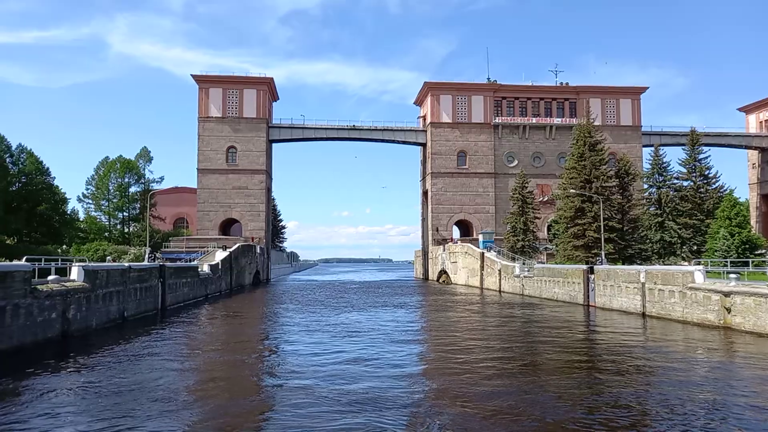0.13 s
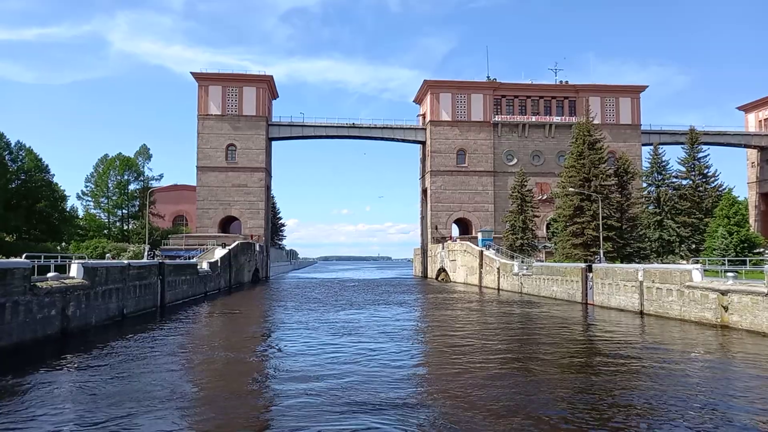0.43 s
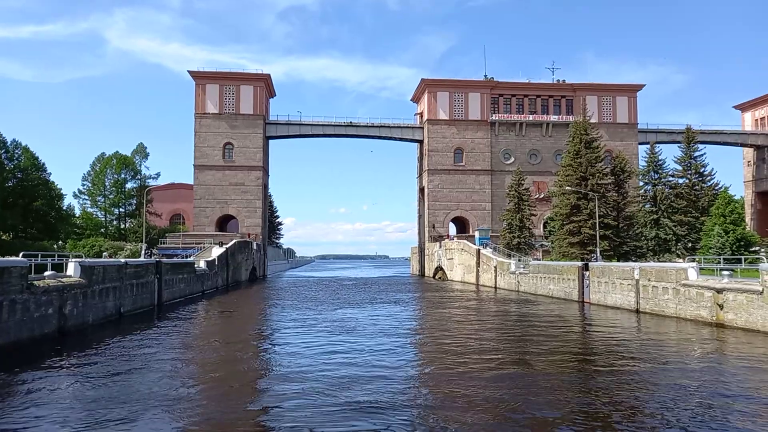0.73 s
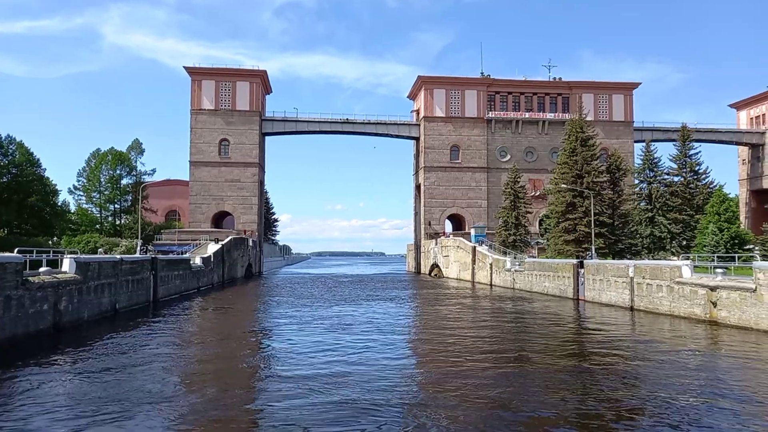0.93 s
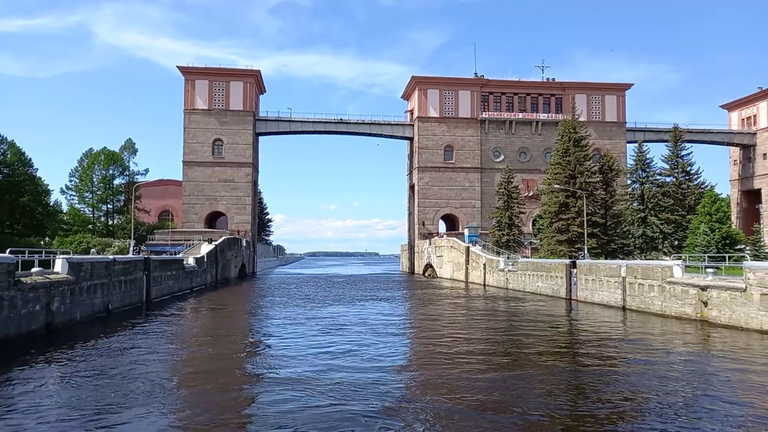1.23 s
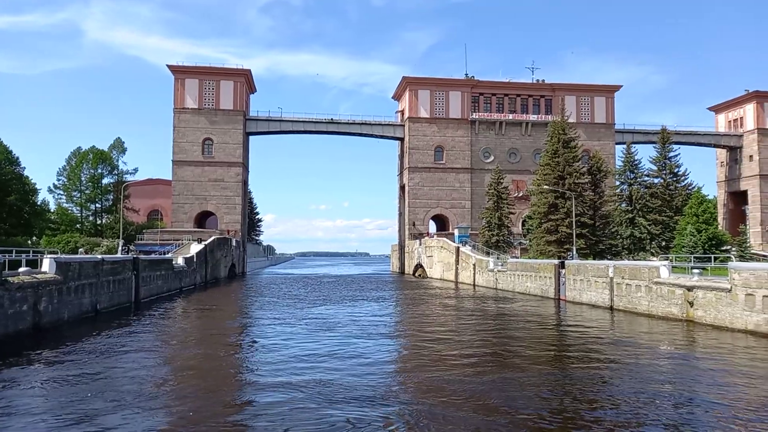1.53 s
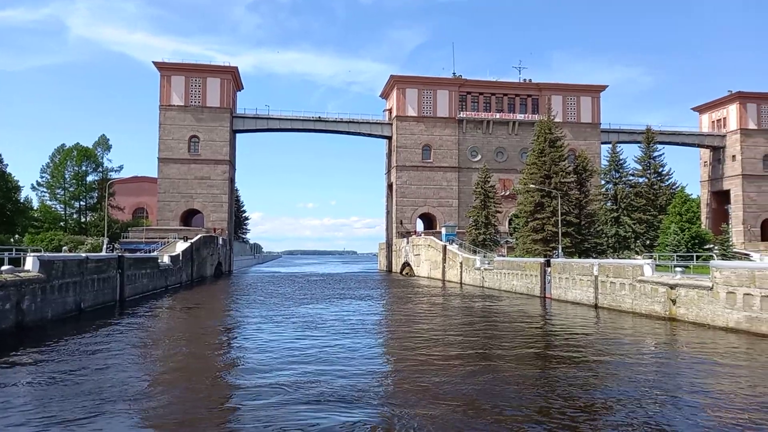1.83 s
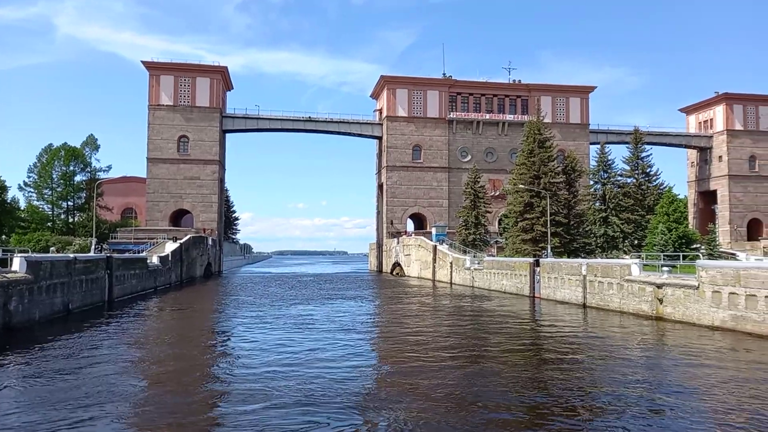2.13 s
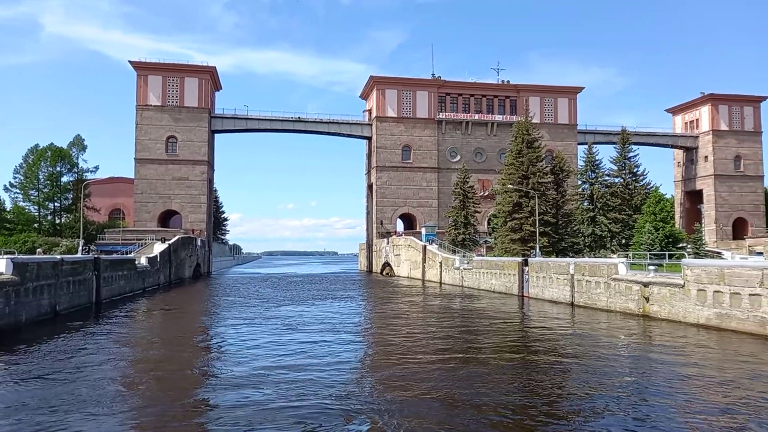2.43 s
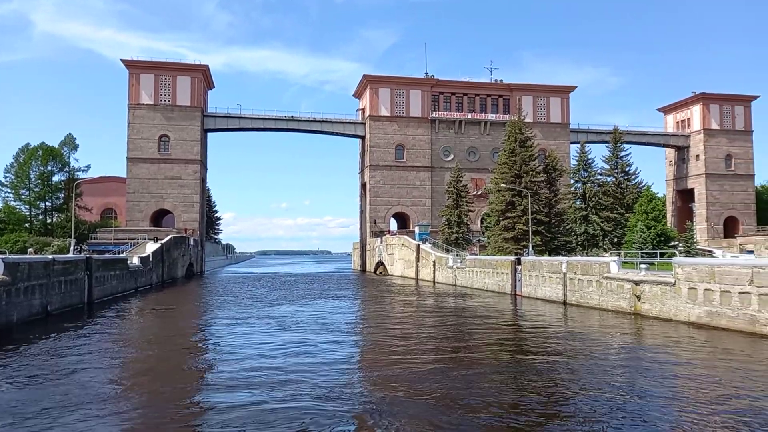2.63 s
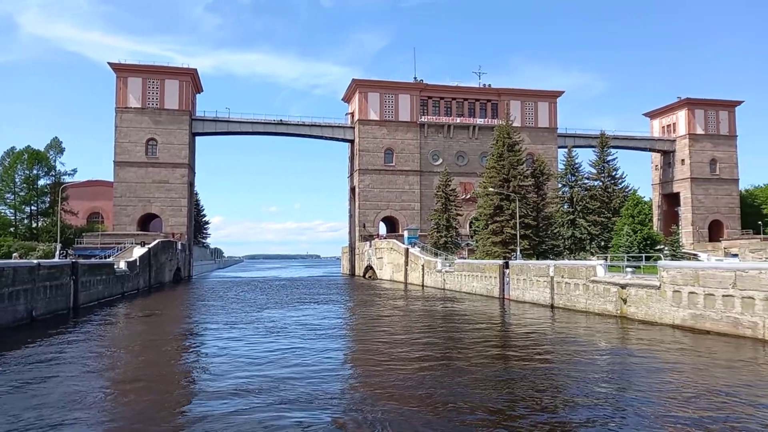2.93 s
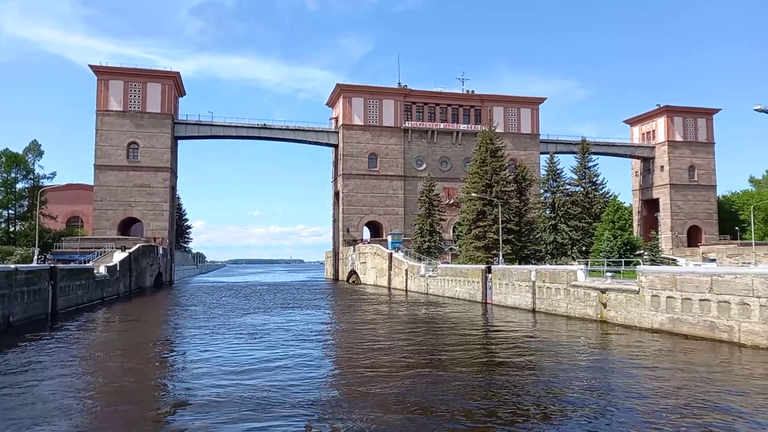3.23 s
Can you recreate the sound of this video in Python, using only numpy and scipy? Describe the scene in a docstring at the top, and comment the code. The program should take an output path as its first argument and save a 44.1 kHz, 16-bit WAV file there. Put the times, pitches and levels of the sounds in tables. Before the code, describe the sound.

A boat's diesel engine rumbles steadily, with faint water wash and a few distant bird chirps.

```python
"""Boat deck on a walled canal

The diesel rumbles and hums below a slow boat and shakes the deck into narrow tones. A machinery
drone climbs in pitch and swells as it crosses a hull resonance. Water washes and ticks along the
side, a loose fitting rings, a thin hiss dies away after a second. Birds whistle and twitter on the
right bank and echo off the walls."""
import sys
import numpy as np
from scipy import signal
from scipy.fft import rfft, irfft
from scipy.io import wavfile

SR = 44100
rng = np.random.default_rng(int(sys.argv[2]) if len(sys.argv) > 2 else 0)


def pcm_store(signal):
    """Save signal as 16-bit PCM."""
    levels = np.round(np.clip(np.atleast_2d(signal), -1, 1) * 32767)
    wavfile.write(sys.argv[1], SR, levels.astype(np.int16).T)


N = 149058
TIME = np.arange(N) / SR
RISE_DB = 0.95 * (TIME - 2)   # slow growth of upper rumble and deck tones


def from_db(db):
    """Decibels to gain."""
    return 10 ** (np.asarray(db) / 20)


def unit_rms(x):
    """Scale to rms 1."""
    return x / np.sqrt(np.mean(x ** 2) + 1e-20)


def in_time(rows):
    """Linear interpolation over time, one signal per value column."""
    times_s, *columns = np.transpose(rows)
    return [np.interp(TIME, times_s, c) for c in columns]


def at_hz(rows, hz):
    """Interpolate each value column over log frequency."""
    points_hz, *columns = np.transpose(rows)
    return np.array([np.interp(np.log(hz), np.log(points_hz), c) for c in columns])


def pan(db):
    """Stereo gains for a left-minus-right level."""
    return from_db([[db / 2], [-db / 2]])


def drift(rate_hz):
    """Smooth random motion, rms 1."""
    hop, settle = 40, 2000
    pole = np.exp(-2 * np.pi * hop * rate_hz / SR)
    white = rng.standard_normal(N // hop + settle + 2)
    slow = signal.lfilter([1], [1, -2 * pole, pole * pole], white)[settle:]
    return np.interp(np.arange(N) / hop, np.arange(len(slow)), unit_rms(slow))


def tone(hz, rms_db):
    """Sine on a pitch track, random phase."""
    return np.sqrt(2) * from_db(rms_db) * np.sin(2 * np.pi * (np.cumsum(hz) / SR + rng.random()))


def resonate(x, hz, width_hz):
    """Two identical resonators in series, peak gain 1."""
    r = np.exp(-np.pi * width_hz / SR)
    b = np.array([1, 0, -1]) * (1 - r * r) / 2
    a = [1, -2 * r * np.cos(2 * np.pi * hz / SR), r * r]
    return signal.lfilter(b, a, signal.lfilter(b, a, x))


def narrow_noise(hz, width_hz):
    """Noise band around a fixed or moving centre, rms 1."""
    phase = 2 * np.pi * np.cumsum(hz * np.ones(N)) / SR
    return unit_rms(drift(width_hz) * np.cos(phase) + drift(width_hz) * np.sin(phase))


def left_lag_s(hz):
    """Left-side delay: higher frequencies reach the right first."""
    max_lag_s, corner_hz = 0.00027, 520
    return max_lag_s * hz / np.hypot(hz, corner_hz)


def lagged(x, hz):
    """Mono to stereo, left side late."""
    return np.array([np.interp(TIME - left_lag_s(hz), TIME, x), x])


def stereo_noise(spectrum):
    """Noise with a spectrum per side, partly coherent, left side late."""
    # likeness of the two sides: (frequency [Hz], coherence [0-1])
    likeness = [(45, 0.3), (90, 0.7), (160, 0.91), (450, 0.77), (800, 0.6), (1100, 0.8), (1600, 0.6),
                (2400, 0.05)]
    hz = np.maximum(np.arange(N // 2 + 1) * SR / N, 1)
    mid, side = rfft(rng.standard_normal((2, N)))
    coherence = np.clip(at_hz(likeness, hz), 0, 1)
    both = np.sqrt(1 + coherence) * mid + np.sqrt(1 - coherence) * side * [[1], [-1]]
    both[0] *= np.exp(-2j * np.pi * hz * left_lag_s(hz))
    low_hz, high_hz = .88 * spectrum[0][0], 1.12 * spectrum[-1][0]
    band = 1 / np.sqrt((1 + (low_hz / hz) ** 16) * (1 + (hz / high_hz) ** 16))
    return irfft(both * band * from_db(at_hz(spectrum, hz)), N) * np.sqrt(SR) / 2


def wall_echo(x):
    """Diffuse echo off the stone walls, independent per side."""
    t60_s, delay_s = 0.53, 0.013
    envelope = from_db(-60 * TIME[:SR] / t60_s) * (TIME[:SR] > delay_s)
    tail = rng.standard_normal((2, SR)) * envelope
    return signal.fftconvolve(x[None], unit_rms(tail) / np.sqrt(SR))[:, :N]


def far_birds():
    """Short warbled notes from the trees, as much echo as direct sound."""
    # notes: (time [s], half length [s], pitch [Hz], level before panning [dB])
    twitters = [(.205, 0.018, 4040, -63), (0.285, .045, 3120, -64), (3.35, 0.057, 3660, -62.5)]
    song = 0
    for at_s, half_s, hz, db in twitters:
        envelope = np.exp(-((TIME - at_s) / half_s) ** 2)
        song += envelope * tone(hz * (1 + 0.05 * drift(50)), db)
    return pan(db=-10) * (song + wall_echo(song))


def bird_whistles():
    """Gliding whistles on the right; the first two, farther off, carry more echo."""
    # one contour per whistle: (time [s], pitch [Hz], relative level [dB])
    whistles = [
        [(.135, 4560, -55), (.175, 3650, -47.5), (.225, 2880, -56)],
        [(.243, 4370, -58), (.283, 3480, -61)],
        [(3.03, 4440, -58), (3.072, 4506, -43), (3.103, 4980, -43), (3.125, 5160, -50.5)],
        [(3.187, 5180, -54.5), (3.23, 3860, -45.5), (3.244, 3710, -38), (3.253, 3910, -42.5),
         (3.274, 3840, -46)],
    ]
    # per whistle: (echo re direct sound [dB])
    echoes_db = [-2, 4, -9, -11.5]
    gain_db, flutter_db, edge_s = -10, 3, .004
    song, echo_send = 0, 0
    for contour, echo_db in zip(whistles, echoes_db):
        hz, db = in_time(contour)
        inside_s = np.minimum(TIME - contour[0][0], contour[-1][0] - TIME)
        gate = np.clip(inside_s / edge_s + .5, 0, 1)
        note = gate * tone(hz * (1 + 0.0045 * drift(130)), db + gain_db + flutter_db * drift(110))
        song += note
        echo_send += from_db(echo_db) * note
    return pan(db=-16.5) * (song + wall_echo(echo_send))


def hiss():
    """Thin high hiss, sinking, then dying away."""
    # hiss before its fade: (frequency [Hz], left [dB/Hz], right [dB/Hz])
    spectrum = [(3920, -92.5, -93), (6560, -102, -94.5), (8500, -99, -108), (12200, -105, -91),
                (15500, -115, -103)]
    # fade: (time [s], gain [dB])
    fade = [(.1, 0.5), (.93, -7.5), (1.15, -24), (1.5, -38)]
    return stereo_noise(spectrum) * from_db(in_time(fade)[0])


def wash():
    """Water sliding along the side, its level flickering."""
    # wash before gain: (frequency [Hz], left [dB/Hz], right [dB/Hz])
    spectrum = [(3150, -88.5, -86.5), (4820, -93.5, -94), (5800, -104, -94), (6880, -103, -99),
                (8570, -95.5, -116), (9550, -113, -119), (15500, -122, -118)]
    gain_db, flicker_db = -2, 1.1
    return stereo_noise(spectrum) * from_db(gain_db + flicker_db * drift(25))


def droplets():
    """Tiny drops at random times, each ringing at one of 20 pitches."""
    drops_per_s, level_db, spread_db, q = 98, -75.5, 1.8, 11
    sizes = from_db(spread_db * np.minimum(rng.exponential(1, N), 4)) * rng.choice([-1, 1], N)
    clicks = sizes * (rng.random(N) < drops_per_s / SR)
    pitch_index = rng.integers(0, 20, N)
    drops = 0
    for k, hz in enumerate(np.geomspace(3800, 7200, 20)):
        drops += resonate(clicks * (pitch_index == k) + 1e-18, hz, hz / q)
    return from_db(level_db) * unit_rms(drops) * pan(db=-5.5)


def splashes():
    """Drips and small splashes: short band-passed noise bursts."""
    # (time [s], level before filtering [dB], decay [s], left-right [dB], centre [Hz], width/centre [1])
    bursts = [(.288, -43, .005, -9, 6540, .1), (.464, -48, .006, -5, 5550, .1),
              (.622, -47, .008, -11, 6500, 0.22), (1.334, -55, .006, -4, 12500, .6),
              (2.45, -44, .012, 9.5, 7820, 0.12), (2.458, -55.5, .025, 8, 7430, .7),
              (2.336, -64, .005, 0, 13300, .3)]
    out = 0
    for at_s, db, decay_s, pan_db, hz, width_ratio in bursts:
        rise_s = .35 * decay_s
        envelope = np.exp(-np.maximum((at_s - TIME) / rise_s, (TIME - at_s) / decay_s))
        burst = envelope * rng.standard_normal((2, N))
        out += from_db(db) * pan(pan_db) * resonate(burst, hz, width_ratio * hz)
    return out


def loose_fitting():
    """A loose metal fitting rings in uneven spells, its pitch sagging."""
    # ringing: (time [s], level before panning [dB])
    spells = [(.1, -62), (.45, -59), (.55, -66), (.86, -58.5), (1.0, -67), (1.25, -61), (2.68, -64),
              (2.88, -57), (3.0, -68)]
    start_hz, sag_hz_per_s = 2160, 18
    ring = narrow_noise(start_hz - sag_hz_per_s * TIME, width_hz=40)
    return pan(db=-2) * from_db(in_time(spells)[0]) * ring


def deck_resonances():
    """The engine shakes machinery and deck into narrow, wavering tones; one swells briefly."""
    # resonances: (frequency [Hz], width [Hz], level before the slow rise [dB])
    modes = [(123.9, 6.8, -42), (331.1, 12, -48), (381.8, 20, -47), (511.8, 21, -50.5), (562.3, 16, -47),
             (725.7, 16, -57.5), (1146, 80, -55.5)]
    swell_at_s, swell_half_s, swell_hz, swell_db = 1.745, 0.061, 568, -35.5
    ringing = 0
    for hz, width_hz, db in modes:
        mode = unit_rms(resonate(rng.standard_normal(N), hz, width_hz))
        ringing += lagged(from_db(db) * mode, hz)
    envelope = np.exp(-((TIME - swell_at_s) / swell_half_s) ** 2)
    swell = from_db(swell_db) * envelope * narrow_noise(swell_hz, width_hz=20)
    return ringing * from_db(RISE_DB) + lagged(swell, swell_hz)


def diesel():
    """Engine orders beat together over a broad rumble, with a slowly fading hum."""
    # engine tones: (multiple of the cycle rate [1])
    orders = np.array([7, 8, 9, 10, 11, 12, 24])
    # per order: (level before bass gain [dB])
    orders_db = [-46, -38.5, -34.5, -41.5, -41.5, -36.5, -43.5]
    # engine and hull rumble before gains: (frequency [Hz], left [dB/Hz], right [dB/Hz])
    spectrum = [(25, -68, -77), (37.5, -67.5, -60.5), (54, -44, -49), (75, -49, -49.5), (99, -47.5, -49.5),
                (135, -44.5, -45), (158, -48.5, -55), (204, -49, -48.5), (243, -49, -47.5),
                (284, -53.5, -54), (420, -59, -60), (569, -60, -60), (703, -71, -67), (781, -65, -66),
                (1002, -76, -73.5), (2190, -81.5, -79.5), (2490, -87, -84.5)]
    # bass swell: (time [s], gain [dB])
    bass_curve = [(.2, 2.5), (.6, -1), (1.7, -.5), (2.35, 1.5), (2.9, -1.5)]
    cycle_hz, flutter_db, split_hz = 6.175, 0.5, 350
    hum_hz, hum_start_db, hum_fade_db_per_s = 188, -34, 2.5
    speed = 1 + 0.0018 * drift(0.97)
    tones = sum(tone(order * cycle_hz * speed, db + flutter_db * drift(1.0))
                for order, db in zip(orders, orders_db))
    hum = tone(hum_hz * speed, hum_start_db - hum_fade_db_per_s * TIME + flutter_db * drift(2.6))
    rumble = stereo_noise(spectrum)
    low = signal.sosfiltfilt(signal.butter(2, split_hz, fs=SR, output="sos"), rumble)
    upper = (rumble - low) * from_db(RISE_DB)
    bass_gain = from_db(in_time(bass_curve)[0])
    return bass_gain * (tones + low) + hum + upper


def machinery_drone():
    """A tone climbs through a hull resonance: rough where weak, pure where the hull rings."""
    # climb: (time [s], pitch [Hz])
    climb = [(2.05, 228.4), (2.33, 242.4), (2.78, 245.5), (2.88, 260.5), (3.15, 269.6), (3.33, 283.7)]
    # swell through the resonance: (time [s], level [dB])
    swell = [(0, -35), (1.0, -39.5), (1.15, -30.5), (2.0, -28), (2.28, -22.5), (2.41, -21.5), (2.58, -15.5),
             (2.68, -21), (2.92, -28.5), (3.38, -28)]
    noise_ceiling_db = -32.5
    hz, db = in_time(climb)[0], in_time(swell)[0]
    roughness = np.minimum(from_db(noise_ceiling_db - db), .7)
    pure = tone(hz * (1 + .005 * drift(12.0)), db)
    noise = from_db(db) * narrow_noise(hz, width_hz=14)
    return np.sqrt(1 - roughness ** 2) * pure + roughness * noise


def scene():
    """Boat, water, hiss and birds, heard from the deck."""
    boat = diesel() + deck_resonances() + loose_fitting() + machinery_drone()
    water = wash() + droplets() + splashes()
    return boat + water + hiss() + bird_whistles() + far_birds()


def record(dry):
    """Abrupt onset and a steep low-pass."""
    start_s, ramp_s, cutoff_hz = .1045, .002, 15800
    gate = np.clip((TIME - start_s) / ramp_s, 0, 1)
    return signal.sosfilt(signal.ellip(12, .1, 90, cutoff_hz, fs=SR, output="sos"), dry * gate)


dry = scene()
out = record(dry)
pcm_store(out)
```